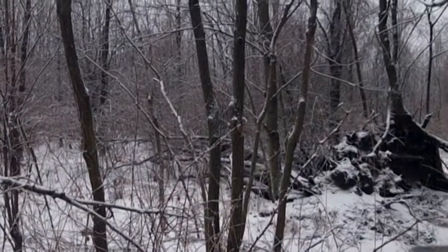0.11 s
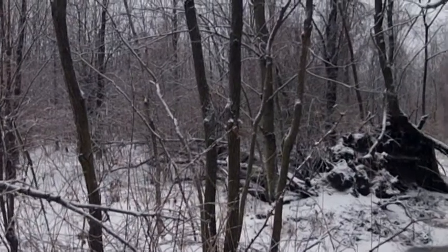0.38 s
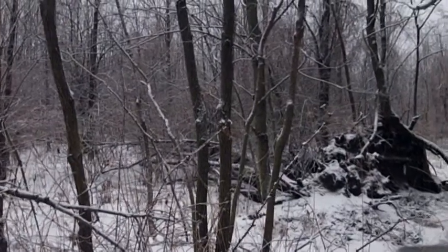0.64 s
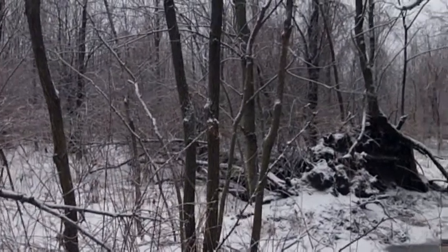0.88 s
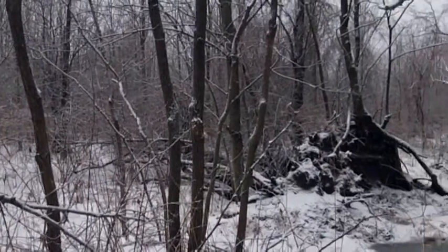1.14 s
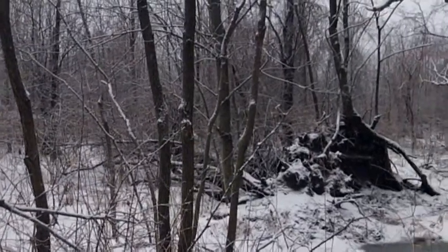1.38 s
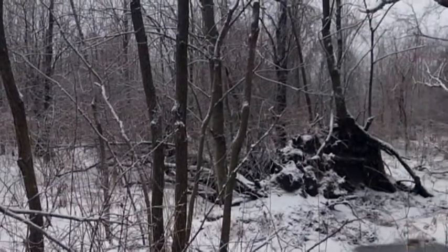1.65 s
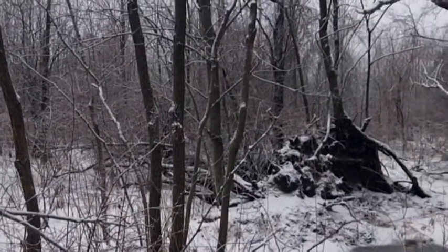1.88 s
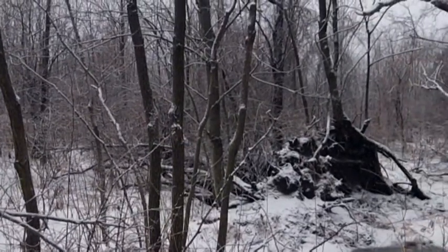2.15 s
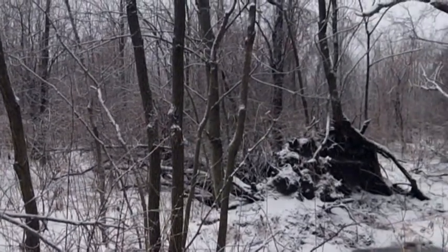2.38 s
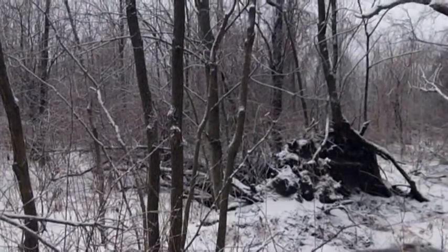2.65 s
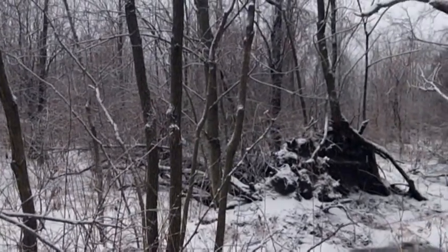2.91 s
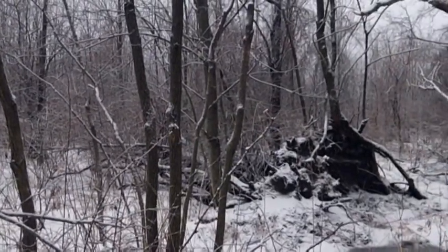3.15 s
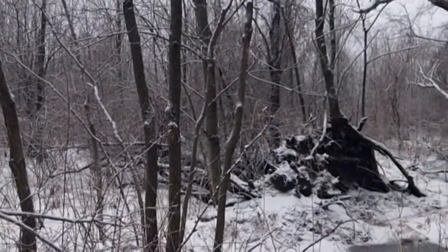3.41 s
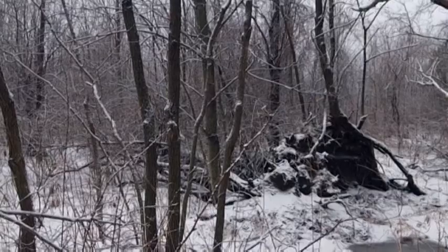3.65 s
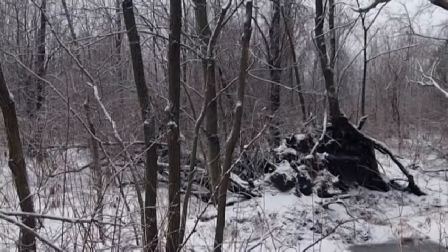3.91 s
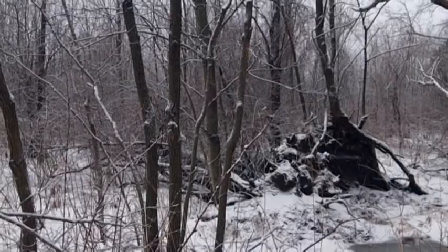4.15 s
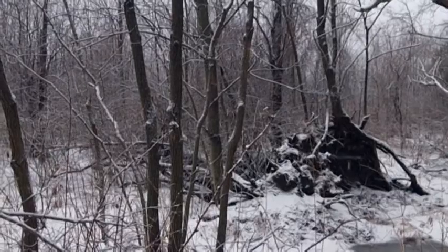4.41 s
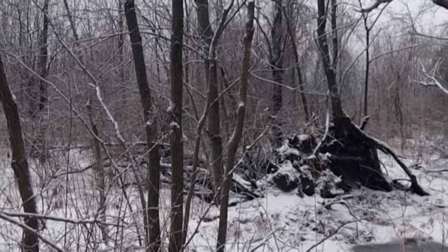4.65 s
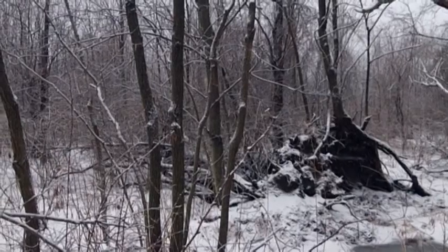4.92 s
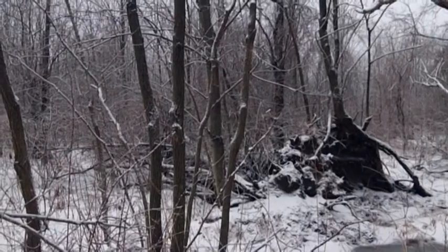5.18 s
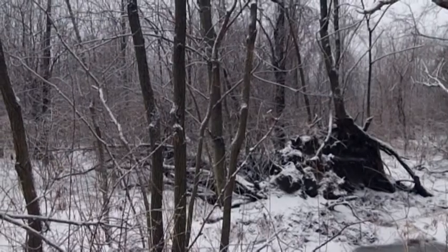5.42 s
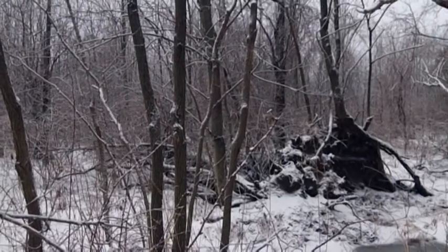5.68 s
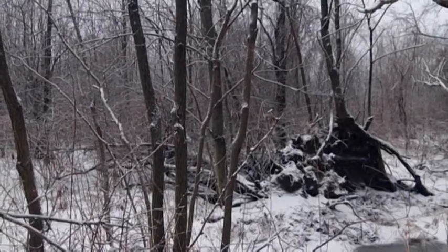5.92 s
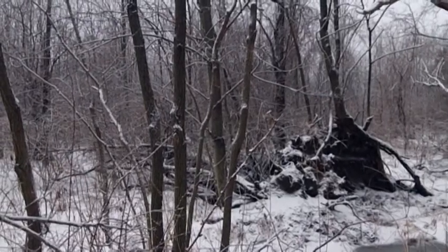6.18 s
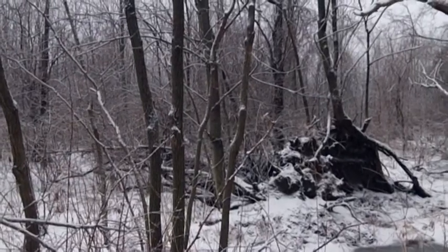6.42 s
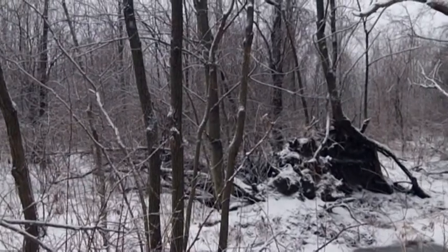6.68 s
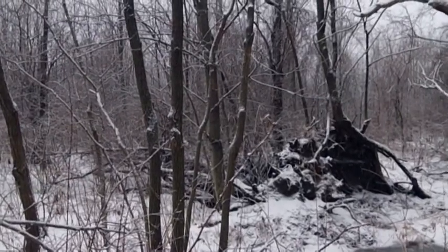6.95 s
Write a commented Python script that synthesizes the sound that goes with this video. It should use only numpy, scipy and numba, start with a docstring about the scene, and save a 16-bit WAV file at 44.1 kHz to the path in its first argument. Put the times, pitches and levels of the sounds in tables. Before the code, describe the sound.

Three hoarse, cracking bays from a dog in quiet woods, then a fainter long howl from a farther dog, with light collar jingles.

```python
"""A collar bell tinkles faintly over hiss and light wind; then three hoarse bays burst from a nearer dog in the woods.
One long howl from a further dog follows; twigs tick and collar tags knock together.
Bays and howl sum harmonic partials with subharmonics and excite vocal resonances with uneven pulses;
gliding sines stand out as whistles. Trunks scatter the voices into a tail, made by convolution with decaying noise.
Bell and tags are damped modes, twigs are short wave packets, air and wind are shaped noise."""
import sys
import numpy as np
from scipy import signal
from scipy.fft import rfft, irfft
from scipy.io import wavfile
from scipy.ndimage import uniform_filter1d
from numba import njit

SR = 44100
rng = np.random.default_rng(int(sys.argv[2]) if len(sys.argv) > 2 else 0)


def makeup_ratio(level_db):
    """Linear amplitude ratio for a level in decibels (20 dB per factor of ten)."""
    decades = np.asarray(level_db, float) / 20
    return 10 ** decades


def wav_out(sig):
    """Save sig, one row per channel (or a flat mono array), as 16-bit PCM at SR to the path in sys.argv[1]."""
    wavfile.write(sys.argv[1], SR, np.round(np.clip(np.atleast_2d(sig).T, -1, 1) * 32767).astype(np.int16))


N = 311346   # samples


def rms_one(x):
    """Normalisation: scale a signal to unit rms."""
    return x / np.sqrt(np.mean(x ** 2) + 1e-20)


def colour(hz, curve):
    """Spectral envelope: level in dB, interpolated along log frequency."""
    curve_hz, curve_db = np.transpose(curve)
    return np.interp(np.log(hz), np.log(curve_hz), curve_db)


def stretch(rows, fade_s=.008):
    """Piecewise-linear control: sample numbers, soft-edged gate and the columns interpolated in time."""
    s, *columns = np.transpose(rows)
    at = np.arange(round(s[0] * SR), min(round(s[-1] * SR), N))
    edge = np.clip(np.minimum(at - at[0], at[-1] - at) / (fade_s * SR), 0, 1)
    return at, np.sin(edge * np.pi / 2) ** 2, [np.interp(at / SR, s, c) for c in columns]


def drift(rate_hz, size):
    """Random modulation: low-passed noise of unit rms."""
    r = np.exp(-2 * np.pi * rate_hz / SR)
    settle = 4000   # samples dropped while the filter settles
    noise = rng.standard_normal(size + settle)
    return rms_one(signal.lfilter([1], [1, -2 * r, r * r], noise)[settle:])


def resonances(x, modes):
    """Formant filtering: parallel resonances of alternating sign, each passed twice for dark valleys."""
    out = 0
    for k, (hz, width_hz, level_db) in enumerate(modes):
        r = np.exp(-np.pi * width_hz / SR)
        section = [(1 - r * r) / 2, 0, (r * r - 1) / 2, 1, -2 * r * np.cos(2 * np.pi * hz / SR), r * r]
        out = out + (-1) ** k * makeup_ratio(level_db) * signal.sosfilt([section, section], x)
    return out


def ring(clicks, hz, t60_s):
    """Damped oscillator: a unit impulse starts a decaying sine of height 1."""
    r, w = makeup_ratio(-60 / (t60_s * SR)), 2 * np.pi * hz / SR
    return signal.lfilter([0, np.sin(w)], [1, -2 * r * np.cos(w), r * r], clicks + 1e-18)


# Spectral density of the steady hiss: (f/Hz, relative level/dB)
AIR_SPECTRUM = [(12, -31), (20, 4.5), (106, -6), (144, -5.5), (213, -8), (1160, -13), (2330, -16),
                (2540, -15.5), (2840, -16), (6360, -20.5), (7950, -32.5), (9130, -22), (15500, -20)]
AIR_DB = -57   # rms level


def air():
    """Stationary noise: still air and microphone hiss, shaped in the frequency domain."""
    hz = np.maximum(np.arange(N // 2 + 1) * SR / N, 10)
    shape = makeup_ratio(colour(hz, AIR_SPECTRUM))
    return makeup_ratio(AIR_DB) * rms_one(irfft(rfft(rng.standard_normal(N)) * shape, N))


# Puffs of wind on the microphone: (t/s, peak level before lumps/dB)
GUSTS = [(0.01, -70), (0.18, -56), (0.61, -62.5), (1.07, -61), (1.36, -63), (2.56, -62), (3.17, -53.5),
         (3.48, -68.5), (3.641, -56.5), (4.15, -61), (4.46, -57), (4.74, -68), (6.76, -65), (7.0, -69)]
GUST_RISE_DB_PER_S, GUST_FALL_DB_PER_S = 152, 248.5
BREEZE_DB, GUST_LUMPS_DB = -81, 2.5   # steady wind under the puffs; rms of the slow level changes


def wind():
    """Amplitude-modulated low noise: puffs swell and die exponentially over a weak breeze."""
    rumble = signal.sosfilt(signal.butter(2, [70, 250], "band", fs=SR, output="sos"), rng.standard_normal(N))
    t, strength = np.arange(N) / SR, makeup_ratio(BREEZE_DB)
    for s, peak_db in GUSTS:
        strength = strength + makeup_ratio(peak_db + np.minimum(GUST_RISE_DB_PER_S * (t - s), GUST_FALL_DB_PER_S * (s - t)))
    return strength * makeup_ratio(GUST_LUMPS_DB * drift(3.3, N)) * rms_one(rumble)


# Strokes of a far collar bell: (t/s, peak level/dB)
BELL = [(0.0112, -53.5), (0.2952, -70), (0.719, -68), (0.841, -64), (1.1443, -63), (1.3915, -56),
        (5.3192, -57.5), (5.4815, -59.5), (5.567, -64)]
BELL_HZ, BELL_T60_S = 2498, .33


def collar_bell():
    """Single damped mode: every stroke excites the same note."""
    clicks = np.zeros(N)
    for s, peak_db in BELL:
        clicks[round(s * SR)] = makeup_ratio(peak_db)
    return ring(clicks, BELL_HZ, BELL_T60_S)


UNDERTONE_DB = -17   # line at half the pitch, against the half-way line
HAZE = .6   # higher partials flutter more, as this power of their number
TORN_DB, TORN_WAVER = 2.8, .012   # extra flutter of level and pitch (share) while hoarse


def clear_voice(tables, upper_db, mouth, hoarse, waver, shimmer_db):
    """Harmonic synthesis with subharmonics: six wavering partials; strong-weak beating adds half-way lines."""
    out = np.zeros(N)
    for rows, dull_db in zip(tables, upper_db):
        at, gate, (hz, level_db, slope_db, half_db) = stretch(rows)
        torn = hoarse[at]
        wobble = waver * drift(40, len(at)) + TORN_WAVER * torn * drift(87, len(at))
        phase = 2 * np.pi * np.cumsum(hz * (1 + wobble)) / SR
        partials = {}   # multiple of the pitch: relative level in dB
        for k in range(1, 7):
            partials[k] = slope_db * (k - 1) + dull_db * max(k - 2, 0) + colour(k * hz, mouth)
        partials[1.5] = half_db
        partials[.5] = half_db + UNDERTONE_DB
        for k, share_db in partials.items():
            flutter_db = shimmer_db * k ** HAZE * drift(26, len(at)) + TORN_DB * torn * drift(45, len(at))
            out[at] += np.sqrt(2) * gate * makeup_ratio(level_db + share_db + flutter_db) * np.sin(k * phase)
    return out


def hoarseness(bursts):
    """Control gate: 1 while the vocal folds beat unevenly, else 0, with soft edges."""
    out = np.zeros(N)
    for s, length_s, *_ in bursts:
        at, gate, _ = stretch([(s, 0), (s + length_s, 0)], fade_s=.015)
        out[at] = np.minimum(out[at] + gate, 1)
    return out


@njit
def moving_resonance(x, cosine, r):
    """Time-varying two-pole resonance: its centre moves sample by sample."""
    y = np.zeros(len(x))
    for i in range(2, len(x)):
        y[i] = x[i] - x[i - 2] + 2 * r * cosine[i] * y[i - 1] - r * r * y[i - 2]
    return y


# Top resonances of the throat: (f/Hz, width/Hz, relative level/dB)
THROAT_TOP = [(2420, 270, 11.5), (3000, 530, 1.5), (4360, 1000, -18)]
TOP_DB = -8   # top resonances against the brightness
MOUTH_WIDTH_HZ, MOUTH_WANDER_HZ = 440, 160   # mouth resonance and its unsteadiness
JITTER_HZ = 45   # how fast the beat rate wanders
RASP_RISE_SHARE, RASP_HOLD_SHARE = .2, .5   # shares of a burst; the rest falls
RASP_FLUTTER_DB, RAGGED_DB = 1.2, 2.5   # whole burst; each bright part alone


def rasp(bursts, throat, beats_per_s, start_db, end_db, sag_hz_per_s, jitter, uneven_db):
    """Source-filter voice: pulses of uneven spacing and strength excite the throat and a mouth that may sag."""
    out, r = np.zeros(N), np.exp(-np.pi * MOUTH_WIDTH_HZ / SR)
    for s, length_s, peak_db, mouth_hz, bright_db in bursts:
        risen = s + RASP_RISE_SHARE * length_s
        held = risen + RASP_HOLD_SHARE * length_s
        shape = [(s, start_db), (risen, 0), (held, 0), (s + length_s, end_db)]
        at, gate, (swell_db,) = stretch(shape, fade_s=.015)
        size = len(at)
        cycles = np.cumsum(beats_per_s * np.exp(jitter * drift(JITTER_HZ, size))) / SR
        pulses = np.diff(np.floor(cycles), prepend=0) * makeup_ratio(uneven_db * rng.standard_normal(size))
        pulses += .03 * rng.standard_normal(size)   # breath noise
        centre_hz = mouth_hz - sag_hz_per_s * (at / SR - s) + MOUTH_WANDER_HZ * drift(25, size)
        cosine = np.cos(2 * np.pi * centre_hz / SR)
        mouth = moving_resonance(moving_resonance(pulses, cosine, r), cosine, r)
        mouth_gain = makeup_ratio(bright_db + RAGGED_DB * drift(30, size))
        top_gain = makeup_ratio(bright_db + TOP_DB + RAGGED_DB * drift(34, size))
        voice = rms_one(resonances(pulses, throat)) + mouth_gain * rms_one(mouth)
        voice += top_gain * rms_one(resonances(pulses, THROAT_TOP))
        out[at] += gate * makeup_ratio(peak_db + swell_db + RASP_FLUTTER_DB * drift(29.5, size)) * voice
    return out


# Clear stretches of the nearer voice: (t/s, pitch f/Hz, lowest partial before mouth colour: level/dB,
# mouth opening as slope/dB per partial, half-way line of strong-weak beating: relative level/dB)
VOICED = [
    [(2.342, 563, -52, -17, -19), (2.358, 573.6, -29, -17, -24), (2.40, 588.4, -38, -16, 0.5),
     (2.42, 507.5, -25, -1, -25), (2.44, 554.5, -28, -14, -14.5), (2.516, 519.4, -32, -6.5, -17.5),
     (2.548, 570, -28, -11.5, -14), (2.565, 562.6, -29.5, -9.5, -12.5), (2.602, 551.4, -26.5, -8.5, -12),
     (2.666, 532.4, -27, -11, -12.5), (2.725, 500, -36.5, -7, -20.5), (2.754, 489.3, -38.5, -10, -8),
     (2.828, 541, -30.5, -19, -19), (2.87, 556.8, -25, -12, -29), (2.9, 536.6, -39.5, -17, -15.5),
     (2.912, 536, -41, -10.5, -11), (2.926, 506, -36, -20, -10), (2.95, 503, -54, -8, -5)],
    [(2.92, 835, -49, -18, -23), (2.948, 800, -34.5, -3, -29), (2.97, 814, -47.5, 0, -26.5),
     (3.05, 759, -54, 1.5, -33)],
    [(3.04, 658, -55.5, -9, -23), (3.056, 679.7, -27, -14, -39), (3.074, 745, -24, -28, -28),
     (3.096, 683.5, -33, -18, -19), (3.118, 707.7, -33, -16, -8), (3.156, 678, -32.5, -8, -11.5),
     (3.196, 697.8, -34, -13, -24), (3.224, 688.5, -30.5, -7.5, -36), (3.238, 698, -29, -4.5, -39),
     (3.282, 701.6, -28, -3, -47), (3.32, 692, -28, -3.5, -42), (3.345, 683.5, -35.5, -0.5, -34),
     (3.385, 680, -33, -4, -44)],
    [(3.365, 1358, -30, -30, -43), (3.385, 1319, -28.5, -22, -50), (3.4, 1205, -31.5, -4, -48),
     (3.42, 1207, -26.5, -3.5, -50), (3.45, 1234, -35.5, -2, -45), (3.483, 1309, -32, -3, -48),
     (3.502, 1316, -55, 7, -35)],
    [(3.496, 1346, -54, -14, -40), (3.509, 1273, -30, -16, -50), (3.516, 957, -39.5, -7, -51),
     (3.525, 660, -33.5, -27, -45), (3.54, 517, -44, -26, -42)],
    [(4.025, 667, -70, 4, -19), (4.039, 660, -34.5, -8, -30), (4.055, 745, -25, -4.5, -47.5),
     (4.068, 776, -40, -1, -24.5)],
    [(4.058, 534, -31, -7, -22), (4.066, 589.7, -39, 7, -21), (4.09, 639, -26, -1, -39.5),
     (4.116, 618, -20.5, -3.5, -44), (4.135, 597, -36, -1, -12), (4.164, 663.4, -24.5, -16, -31),
     (4.18, 663, -30, -1.5, -39), (4.208, 633, -34, -26, -28), (4.225, 627, -44, -8, -12.5)],
    [(4.19, 1195, -21.5, -32, -33), (4.22, 1110, -34.5, -0.5, -46), (4.26, 1045, -33.5, -8, -28),
     (4.305, 1105, -31.5, -6, -27), (4.33, 1039, -32.5, -6, -24), (4.36, 1113, -32.5, -9, -29),
     (4.4, 1081, -32, -11.5, -17), (4.472, 1019, -39.5, 3, -29), (4.54, 1134, -37, -3.5, -22),
     (4.556, 1105, -29, -2.5, -25), (4.63, 1094, -31, -3.5, -39), (4.647, 1090, -50, -6, -26)],
    [(4.638, 1067, -49, -15, -23), (4.652, 815, -46, -17, -28), (4.662, 650, -32, -16, -42),
     (4.675, 600, -56, -10, -26)],
    [(4.325, 740, -40.5, -17, -22), (4.347, 644, -27, -22, -43), (4.373, 665, -29.5, -19, -40),
     (4.41, 650, -54, -12, -13)],
]
# Extra slope of each stretch above the second partial: (slope/dB per partial)
UPPER_SLOPES = [-16, -22.5, -2, -6.5, -19, -11, -10, -10, -21, -6]
# Colour of the open jaws: (f/Hz, relative level/dB)
MOUTH = [(300, 0.2), (1300, 0.63), (1650, -6), (1900, -7), (2200, -1.5), (2800, -3.5), (3450, -20),
         (4200, -15.5), (4900, -16), (7000, -34)]
# Hoarse bursts: (start t/s, length t/s, throat level/dB, mouth resonance at the start f/Hz,
# brightness against the throat: level/dB)
RASP = [(2.355, 0.1, -35, 1750, -12), (2.44, 0.11, -35, 1440, -19), (2.71, .08, -45, 1490, -10.5),
        (2.79, 0.17, -41.5, 1670, -16.5), (3.055, 0.12, -37.5, 1960, -0.5), (3.13, 0.1, -32.5, 1700, -7.5),
        (4.055, .05, -46, 2540, -2.5), (4.12, .09, -31.5, 1900, -16.5), (4.31, 0.061, -36, 2040, -4.5),
        (4.2, 0.26, -58, 1960, 2)]
# Throat resonances: (f/Hz, width/Hz, relative level/dB)
THROAT = [(570, 200, 0.1), (1000, 350, 0.1)]


def near_dog():
    """Register breaks: chest voice, rasp and squeal join in three bays."""
    voice = clear_voice(VOICED, UPPER_SLOPES, MOUTH, hoarseness(RASP), waver=.0046, shimmer_db=1.19)
    # the closing jaws lower the mouth resonance
    return voice + rasp(RASP, THROAT, beats_per_s=330, start_db=4, end_db=-8.5, sag_hz_per_s=1200,
                        jitter=.09, uneven_db=2.0)


# Lone lines where the nearer dog's chest voice and squeal mix or one overtone stands out;
# the last two are strong overtones of the further dog's howl:
# (start t/s, end t/s, from f/Hz, to f/Hz, level at mid-glide before shimmer/dB)
WHISTLES = [(2.36, 2.415, 1760, 1720, -41), (2.365, 2.415, 2680, 2600, -46), (2.38, 2.43, 960, 1020, -29),
            (2.77, 2.83, 2030, 2130, -48), (2.78, 2.845, 1520, 1620, -45), (3.17, 3.245, 1700, 1480, -31),
            (4.125, 4.18, 1150, 1100, -29), (4.12, 4.22, 3050, 3040, -41), (4.32, 4.385, 2980, 2930, -41),
            (4.37, 4.45, 2820, 2640, -45), (4.34, 4.405, 1800, 1680, -41), (4.42, 4.5, 1720, 1730, -47),
            (4.29, 4.33, 530, 535, -46), (4.37, 4.46, 535, 530, -42), (5.82, 6.01, 1410, 1375, -48),
            (6.4, 6.64, 1770, 1680, -57)]
WHISTLE_EDGE_DB = -9.5   # each swells from and falls back to this, against its middle


def whistles(waver=.019, shimmer_db=2.5):
    """Frequency modulation: single unsteady sines of both dogs glide, swell and fade."""
    out = np.zeros(N)
    for s, end, from_hz, to_hz, peak_db in WHISTLES:
        at, gate, (share,) = stretch([(s, 0), (end, 1)])
        hz = (from_hz + share * (to_hz - from_hz)) * (1 + waver * drift(50, len(at)))
        phase = 2 * np.pi * np.cumsum(hz) / SR
        level_db = peak_db + WHISTLE_EDGE_DB * np.abs(2 * share - 1) + shimmer_db * drift(40, len(at))
        out[at] += np.sqrt(2) * gate * makeup_ratio(level_db) * np.sin(phase)
    return out


HISS_HZ, HISS_WIDTH_HZ, HISS_DB = 4320, 1200, -39   # level against the voice


def teeth_hiss(voice):
    """Turbulence noise: air rushing past the teeth follows the running rms of the voice."""
    effort = np.sqrt(uniform_filter1d(voice ** 2, size=SR // 50) + 1e-14)
    haze = rms_one(resonances(rng.standard_normal(N), [(HISS_HZ, HISS_WIDTH_HZ, 0)]))
    return makeup_ratio(HISS_DB + 3 * drift(18, N)) * effort * haze


WOODS_T60_S, WOODS_GAP_S = 1, .013   # decay time; time constant of the build-up
WOODS_DB, WOODS_CUT_HZ = -14.5, 9000


def woods(x):
    """Diffuse scattering: countless trunks return a dull, dense, exponentially dying tail."""
    t = np.arange(2 * SR) / SR
    echoes = rng.standard_normal(len(t)) * makeup_ratio(-60 * t / WOODS_T60_S) * (1 - np.exp(-t / WOODS_GAP_S))
    echoes = signal.sosfilt(signal.butter(1, WOODS_CUT_HZ, fs=SR, output="sos"), echoes)
    tail = signal.fftconvolve(x, echoes / np.sqrt(np.sum(echoes ** 2)))[:N]
    # stirring air keeps changing the paths (0.2 ms rms) and blurs the pitch
    sway = 2e-4 * SR * drift(6, N)
    return makeup_ratio(WOODS_DB) * np.interp(np.arange(N) + sway, np.arange(N), tail)


# Ticking twigs: (t/s, level/dB, f/Hz)
TICKS = [(3.4933, -40, 4100), (3.5303, -31.5, 3520), (3.9482, -38, 4500), (4.7253, -29, 3120),
         (5.7202, -42.5, 3260)]


def twigs(turns=1.46):
    """Gaussian wave packet: each dry snap lasts a couple of cycles."""
    out, t = np.zeros(N), np.arange(-100, 100) / SR
    for s, level_db, hz in TICKS:
        packet = np.exp(-2 * (t * hz / turns) ** 2) * np.sin(2 * np.pi * hz * t)
        out[round(s * SR) - 100:][:len(t)] += makeup_ratio(level_db) * packet
    return out


# Knocks of metal tags: (t/s, strength before the common trim/dB, extra level of modes below 4600 Hz/dB)
TAGS = [(5.1093, -35, -2), (5.1874, -44, 6.5), (5.2784, -47.5, 3), (6.8848, -54.5, 14.5),
        (6.9594, -48.5, 12)]
# Modes of the tags: (f/Hz, relative level/dB, T60 t/s)
TAG_MODES = [(1951, -7, 0.52), (3520, -9.5, 0.14), (4260, -16, .4), (4500, -3, 0.0046), (5150, 3, 0.22),
             (5430, 3.5, 0.065), (9000, -10.5, 0.37), (9518, -10, 0.11), (11300, -12, 0.046),
             (12730, -12, 0.11)]


def collar_tags():
    """Modal synthesis: each knock excites all damped modes with new random strengths."""
    s, strength_db, low_db = np.transpose(TAGS)
    out, at = np.zeros(N), np.round(s * SR).astype(int)
    for hz, mode_db, t60_s in TAG_MODES:
        clicks = np.zeros(N)
        chance_db = rng.normal(0, .93, len(at))
        clicks[at] = makeup_ratio(strength_db + mode_db - 13 + low_db * (hz < 4600) + chance_db)   # -13 dB common trim
        out += ring(clicks, hz, t60_s)
    return out


# Clear stretches of the further voice: (t/s, pitch f/Hz, lowest partial before mouth colour: level/dB,
# mouth opening as slope/dB per partial, half-way line: relative level/dB)
FAR_VOICED = [
    [(5.69, 387.7, -64.5, 8, -25), (5.746, 464, -45, 1.5, -8), (5.83, 462, -50.5, 1.5, -5),
     (5.888, 489, -38, -21, -25), (5.96, 456.2, -48, -1, -6.5), (6.1, 458.3, -46.5, 0.5, -7),
     (6.19, 431, -46.5, -4, -33), (6.27, 456.7, -44, -1, -32), (6.39, 426.2, -45, -3, -14),
     (6.47, 437.5, -41.5, -7, -26), (6.55, 424, -42.5, -1.5, -28), (6.59, 416, -50, 0, -28)],
    [(6.58, 418.3, -47.5, 0.45, -34), (6.628, 371, -44, -5.9, -15), (6.655, 300.5, -39.5, -1, -32),
     (6.672, 268, -45, -0.34, -22)],
]
# Extra slope of each stretch above the second partial: (slope/dB per partial)
FAR_UPPER_SLOPES = [-4.5, -15]
# Colour of the further mouth: (f/Hz, relative level/dB)
FAR_MOUTH = [(280, -27), (400, -0.8), (950, -1.6), (1350, -11.5), (1800, -18), (2300, -35), (3000, -21)]
# Hoarse bursts of the further dog: (start t/s, length t/s, throat level/dB, mouth resonance f/Hz,
# brightness against the throat: level/dB)
FAR_RASP = [(5.7, .3, -47, 1440, -13.5), (5.98, .62, -51, 1580, -14)]
# Throat resonances of the further dog: (f/Hz, width/Hz, relative level/dB)
FAR_THROAT = [(650, 156, 2), (950, 330, -17.5)]


def far_dog():
    """Harmonic and source-filter voice: one long howl whose hoarseness tears the partials less."""
    torn = .47 * hoarseness(FAR_RASP)
    voice = clear_voice(FAR_VOICED, FAR_UPPER_SLOPES, FAR_MOUTH, torn, waver=.0078, shimmer_db=1.5)
    return voice + rasp(FAR_RASP, FAR_THROAT, beats_per_s=240, start_db=-11, end_db=-8.5, sag_hz_per_s=0,
                        jitter=.12, uneven_db=2.2)


def scene():
    """Superposition: direct voices, their scattered tail, collars, twigs and air add linearly."""
    bays_and_whistles = near_dog() + whistles()
    bays_and_whistles += teeth_hiss(bays_and_whistles)
    howl = far_dog()
    tail = woods(bays_and_whistles + makeup_ratio(-1) * howl)   # slightly less tail from the howl
    collars = collar_bell() + collar_tags()
    return (bays_and_whistles + howl + tail + collars + twigs() + air() + wind())[None]


def band_limit(x):
    """A steep low-pass at the top of the band."""
    return signal.sosfilt(signal.butter(12, 15890, fs=SR, output="sos"), x)


# Gaps in the recorder's response: (f/Hz, width/Hz, level/dB)
NOTCHES = [(7860, 193, -27), (11880, 99, -19)]


def record(dry):
    """Linear filtering: the recorder has two narrow gaps in its treble."""
    hz = np.arange(N // 2 + 1) * SR / N
    gaps_db = sum(depth_db * np.exp(-((hz - at_hz) / width_hz) ** 2) for at_hz, width_hz, depth_db in NOTCHES)
    mix = irfft(rfft(dry) * makeup_ratio(gaps_db), N)
    return band_limit(mix)


dry = scene()
out = record(dry)
wav_out(out)
```